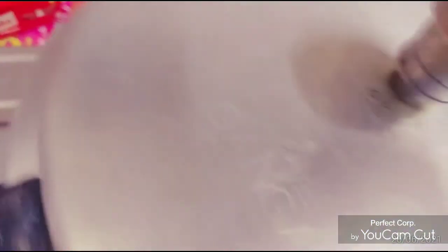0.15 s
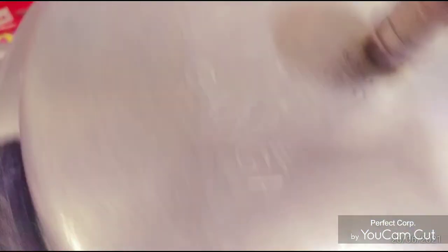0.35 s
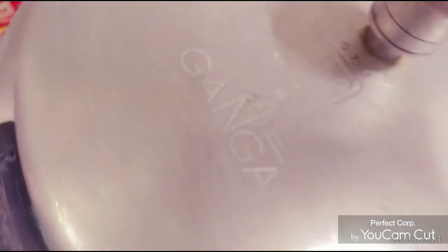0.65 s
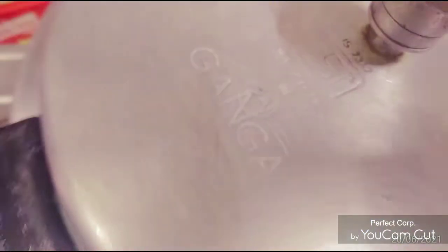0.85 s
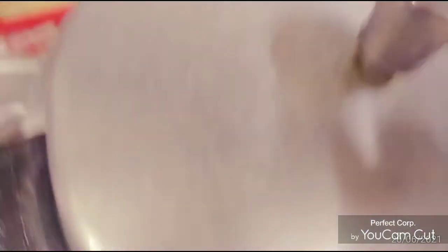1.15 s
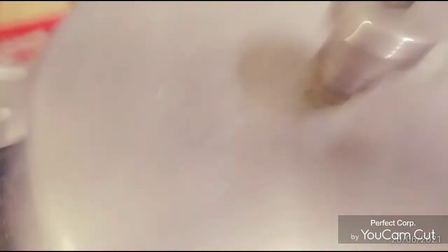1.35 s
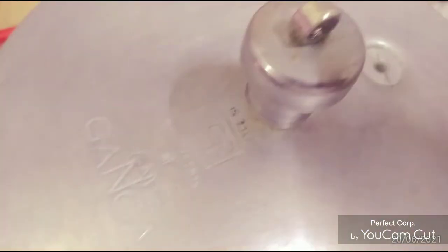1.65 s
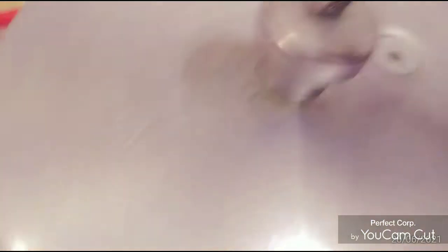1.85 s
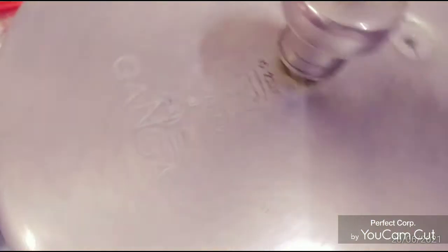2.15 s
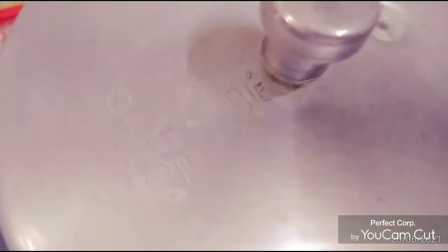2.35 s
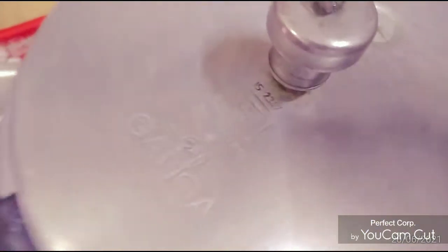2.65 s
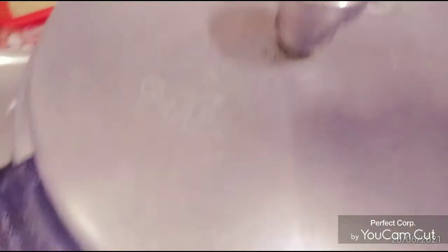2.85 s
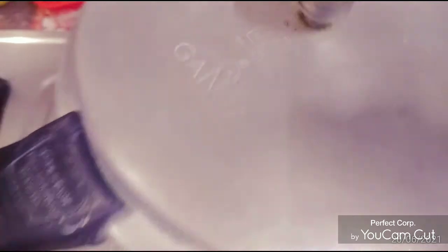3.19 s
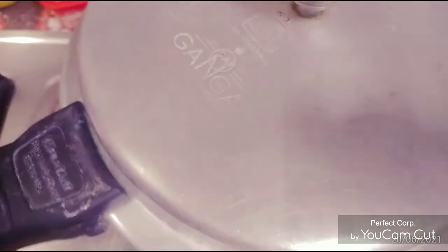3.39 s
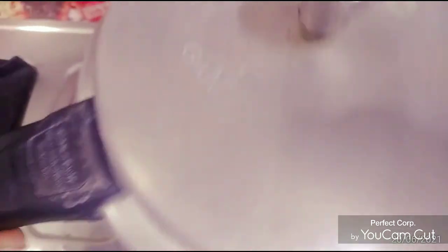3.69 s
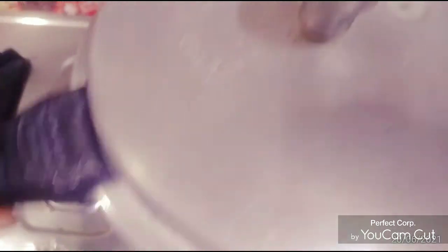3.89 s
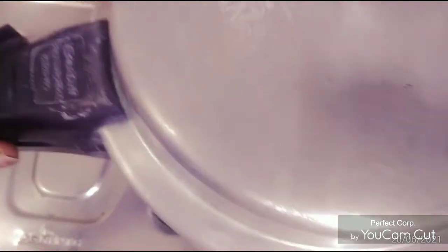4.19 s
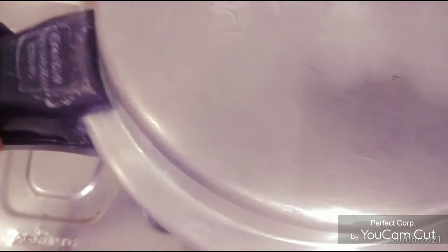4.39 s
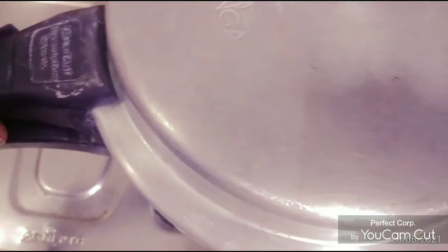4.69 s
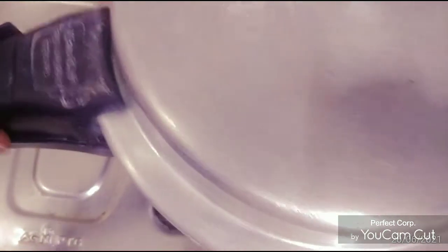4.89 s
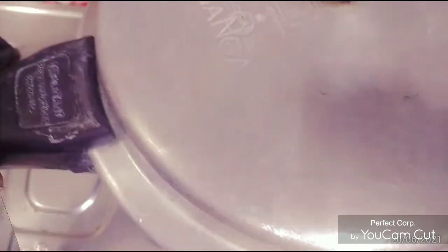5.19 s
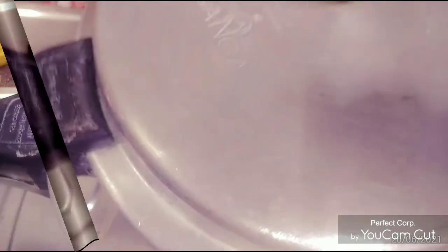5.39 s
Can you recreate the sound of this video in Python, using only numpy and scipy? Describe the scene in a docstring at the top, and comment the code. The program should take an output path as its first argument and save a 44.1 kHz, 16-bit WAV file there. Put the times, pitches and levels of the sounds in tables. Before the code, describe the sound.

A close phone recording in a small, quiet kitchen with faint low rumble and hiss. From 0 to 0.4 s a metal pressure cooker lid is shoved on its pot: bright, sharp clinks at about 0.15 and 0.33 s, with hollow low booms and short gritty scrapes. Then near silence, with tiny finger brushes at 0.7 and 1.1 s and a crisp tick at 1.33 s. From 1.8 to 2.7 s come duller, spaced bumps with juddering slides, and a clearer ringing clank at 2.78 s. Soft taps and scrapes run from 3.0 to 3.3 s. Between 3.54 and 4.07 s the loudest passage arrives: a fast, uneven rattle of hard clanks, ringing rim and scraping as the lid is twisted shut. Afterwards only a light scrape near 4.4 s and a weak pair of knocks with rubbing around 4.9 s, then quiet background. Decays are short, with a slight room tail.

```python
"""Metallic clinks, hollow booms and scrapes sound as a pressure cooker lid is shuffled over its pot's rim,
rattles into its lugs and is twisted shut. Each impact is chattering noise and decaying modes: lid boom,
wall knock, rim ring and treble clink. Around and between impacts, noise driven by random slips makes the
rim scrape, and a wavering tone makes the lid judder. Shaped noise gives the fingers brushing the phone
held close, the short tail of the small kitchen and its quiet rumble and hiss."""
import sys
import numpy as np
from scipy import signal
from scipy.fft import rfft, irfft, next_fast_len
from scipy.io import wavfile

SR = 44100
rng = np.random.default_rng(int(sys.argv[2]) if len(sys.argv) > 2 else 0)


def to_wav(s):
    """Save 16-bit WAV."""
    ch = np.atleast_2d(s).T  # columns
    pcm = np.round(np.clip(ch, -1, 1) * 32767)  # PCM
    wavfile.write(sys.argv[1], SR, pcm.astype(np.int16))


N = 244198  # samples

# registers of the metal: (low_hz, high_hz)
KNOCK_HZ, RING_HZ, CLINK_HZ = (450, 1550), (1550, 2700), (2700, 14500)
BLOW_S = 0.012  # opening of an impact over which its level is set

# Rim strikes: (start_s, strength_db, edge_db, sharpness_db)
# a flat landing (edge below 0) booms the lid, an edge-on one rings the rim; sharpness adds treble
RIM_STRIKES = [(.059, -48.5, -6.5, 9), (0.106, -41, -7.5, 13), (.145, -28, 0.5, 0.5),
               (0.1511, -30, -1.5, 8.5), (.326, -34, -6.5, 8), (.339, -38.5, -3, 10.5), (.357, -38.5, 6, 6),
               (.364, -41, -3, 9.5), (1.777, -45.5, -7, 0), (1.823, -44, -1, 0), (1.843, -43.5, -7, -5),
               (1.875, -36, -4.5, -6), (2.158, -40.5, -12.5, -9), (2.192, -34.5, -3.5, -3.5),
               (2.361, -40.5, -6, -4.5), (2.436, -35.5, 0.5, -6.5), (2.613, -35.5, -2, -8),
               (2.782, -28, 1.5, -2.5), (3.029, -44.5, -5.5, -3), (3.117, -42, -1.5, -5),
               (3.178, -45.5, -2, 0.5), (3.234, -44.5, -0.5, -3.5), (3.309, -43.5, -2, 0),
               (3.5354, -37.5, 3.5, -14), (3.54, -26, 1.5, -1.5), (3.6027, -31.5, 3.5, -2),
               (3.645, -24, 0.5, 0), (3.663, -38.5, 8, -5.5), (3.731, -35, -2, 2), (3.787, -39, 12.5, -2),
               (3.8347, -23.5, -1.5, -2), (3.93, -25.5, -2, 3), (3.9935, -35, 0.5, -4),
               (4.004, -27, -1, -3.5), (4.01, -34.5, 10, -3.5), (4.066, -39, 1.5, -6), (4.459, -49, -8, -1),
               (4.818, -50.5, -2, -6), (4.899, -39.5, -5.5, 2), (4.969, -39, -6.5, -7)]


def clinks():
    """Impact excitation: every strike booms the lid and sounds three registers of the metal."""
    out = np.zeros(N)
    t = np.arange(int(0.3 * SR)) / SR
    for start_s, strength_db, edge_db, sharpness_db in RIM_STRIKES:
        boom_db, knock_db, ring_db, clink_db = contact_levels(start_s, strength_db, edge_db, sharpness_db)
        low_boom = boom(t, lid_pitch(start_s), t60=0.064, thud_db=-10.0)
        # only hard knocks set the wall's low modes ringing clearly
        clear_db = 0.76 * (knock_db + 24.5)
        knock = strike(t, KNOCK_HZ, onset_s=0.000072, chatter_s=0.0038,
                       tail_db=1.5, tail_t60=0.07, modes_db=clear_db)
        ring = strike(t, RING_HZ, onset_s=0.00064, chatter_s=0.0076,
                      tail_db=-6.5, tail_t60=0.095, modes_db=seating(start_s)[0])
        clink = strike(t, CLINK_HZ, onset_s=0.0035, chatter_s=0.0056,
                       tail_db=-10, tail_t60=0.055, modes_db=-9)
        # a lighter touch has less of the highest treble
        top_db = clink_db + 26.5
        clink = unit(tint(clink, [(8500, 0), (13000, top_db)]), int(BLOW_S * SR))
        hit = undb(boom_db) * low_boom + undb(knock_db) * knock
        hit += undb(ring_db) * ring + undb(clink_db) * clink
        add(out, start_s, hit)
    return out


def strike(t, band, onset_s, chatter_s, tail_db, tail_t60, modes_db):
    """Contact chatter and modal decay: brief noisy contact, a dense dying tail and clear ringing modes."""
    blow = int(BLOW_S * SR)
    # uneven bounces: the contact level fluctuates mostly on a scale of a millisecond or so
    bounce_db = 4 * tint(noise(len(t)), [(300, 0), (700, 0), (2000, -30)], (200, 2000))
    chatter = unit(undb(bounce_db)) * np.exp(-(t / chatter_s) ** 4)
    contact = chatter + undb(tail_db) * fade(t, tail_t60)
    crack = unit(wall(len(t), band) * contact * (1 - np.exp(-t / onset_s)), blow)
    ring = unit(rim_modes(t, band) * (1 - np.exp(-t / 0.00096)), blow)
    return unit(crack + undb(modes_db) * ring, blow)


# Clear modes of the rim and pot wall: (pitch_hz, level_db, t60_s)
RIM_MODES = [(1100, -8.5, 0.097), (1336, -3.5, 0.016), (1683, -6, 0.09), (1764.4, 2.5, 0.058),
             (2142, -15.5, 0.15), (3876, 1.5, 0.056), (4060, -13.5, 0.1), (4630, -16, 0.12),
             (6480, -5, 0.1), (7100, -12, 0.086), (8280, 0, 0.12), (8500, -13, .055), (7930, 1, 0.061),
             (10020, -2, 0.1), (13120, -22, 0.025)]


def rim_modes(t, band):
    """Modal superposition: damped sines, whose shares shift a few dB with the point of contact."""
    out = 0
    for pitch_hz, level_db, t60 in RIM_MODES:
        if band[0] < pitch_hz < band[1]:
            cycles = pitch_hz * (1 + 0.003 * rng.normal()) * t + rng.random()
            gain = undb(level_db + 2 * rng.normal())
            out = out + gain * fade(t, t60) * np.sin(2 * np.pi * cycles)
    return out


# Spectrum of the dense, quickly damped modes of the metal: (pitch_hz, level_db)
METAL_SPECTRUM = [(480, 4.5), (850, -0.5), (1300, -0.5), (2000, 3.5), (2500, -8), (3400, -9), (3900, -2.5),
                  (4700, -12), (5400, -23.5), (6100, -11), (8400, 1), (10300, -12.5), (11800, -24),
                  (14000, -25)]


def wall(size, band):
    """High modal density: shaped noise, whose spectrum varies by contact, most of all in the treble."""
    hz = np.linspace(400, 14500, 100)
    ripple_db = np.interp(hz, [2500, 6000], [1.5, 4])
    metal_hz, metal_db = np.transpose(METAL_SPECTRUM)
    db = np.interp(np.log(hz), np.log(metal_hz), metal_db) + ripple_db * noise(len(hz))
    return tint(noise(size), np.column_stack([hz, db]), band)


# Spectrum of the dull thud of the pot on its stand: (pitch_hz, level_db)
POT_THUD = [(45, -16), (105, 2), (210, -1.5), (330, 3.5), (470, -0.5), (850, -27)]


def boom(t, hz, t60, thud_db):
    """Flexural resonance: the lid flexes like a drum head over a dull thud of the pot."""
    blow = int(BLOW_S * SR)
    flex = 0
    # a weaker mode on each side beats with the main one
    for ratio, level_db in ((0.91, -36), (1, 11), (1.08, -3.5)):
        mode_hz = hz * ratio * (1 + 0.013 * rng.normal())
        flex = flex + undb(level_db) * np.sin(2 * np.pi * mode_hz * t)
    flex = unit(flex * fade(t, t60) * (1 - np.exp(-t / 0.0037)), blow)
    thud = tint(noise(len(t)), POT_THUD) * fade(t, 0.13)
    return unit(flex + undb(thud_db) * thud * (1 - np.exp(-t / 0.0012)), blow)


# The lid's lowest mode sags in the early shoves, then wanders between about 300 and 345 Hz:
# (time_s, pitch_hz)
LID_MODE = [(.07, 402.3), (.16, 355), (.37, 300.8), (1.78, 345), (1.9, 306.4), (2.16, 341.3), (2.2, 304),
            (2.44, 312), (2.62, 345), (3.93, 338.8), (4.05, 315.5), (4.95, 342)]


def lid_pitch(s):
    """Boundary conditions: the way the lid is seated sets its lowest mode in Hz at time s."""
    return np.interp(s, *np.transpose(LID_MODE))


# The loose lid knocks on the pot wall; the rim rings clearest against the lugs:
# (time_s, clear_modes_db, knock_db)
LID_SEATING = [(.15, -16, 1), (.33, -13, -3), (2.5, -4.5, -4), (2.78, 9, -7), (4.05, 4, -3.5),
               (4.5, 0.5, -1)]


def seating(s):
    """Contact coupling: levels of the clear modes and of the knock at time s, in dB."""
    times, *columns = np.transpose(LID_SEATING)
    return [np.interp(s, times, column) for column in columns]


def contact_levels(s, strength_db, edge_db, sharpness_db):
    """Modal excitation: a contact's angle and sharpness share it among boom, knock, ring and clink."""
    boom_db = strength_db - edge_db
    knock_db = strength_db + seating(s)[1]
    ring_db = strength_db + edge_db
    return boom_db, knock_db, ring_db, ring_db + sharpness_db


# Slides of the lid along the rim: (start_s, end_s, strength_db, edge_db, sharpness_db)
RIM_SLIDES = [(0.031, .1, -47.5, -5, 0), (0.094, 0.149, -37, -5.5, 1), (.16, 0.254, -41.5, -4.5, 2.5),
              (.27, 0.388, -43.5, -6.5, 2.5), (0.476, 0.506, -64, -10.5, -6), (1.809, 1.924, -49, 3, -3.5),
              (2.125, 2.195, -41, -2, -3), (2.201, 2.284, -50.5, 2.5, -2), (2.33, 2.434, -50.5, -1, -1.5),
              (2.643, 2.755, -47.5, -0.5, -3), (3.047, 3.08, -46, 1.5, -17), (3.127, 3.152, -45, -1.5, -10),
              (3.2, 3.317, -43, 1, -6.5), (3.553, 3.594, -36, -0.5, -3), (3.621, 3.673, -39, 2.5, 1),
              (3.669, 3.797, -42.5, 5, -8), (3.871, 3.986, -47, -1.5, -3.5), (4.029, 4.129, -42, -2.5, -11),
              (4.383, 4.491, -46, -2.5, -3), (4.714, 4.722, -55.5, -2, -14), (4.843, 4.87, -47.5, -1, -2),
              (4.914, 4.969, -49, -1.5, -6)]
PUSH_DB = 2  # growth over a slide as the hand pushes on


def scrapes(judder_gain_db, rasp_gain_db, grit_gain_db, overhang_s):
    """Frictional excitation: low judder, a ringing rasp in the wall and fine grit on top."""
    out = np.zeros(N)
    for start_s, end_s, strength_db, edge_db, sharpness_db in RIM_SLIDES:
        s = start_s - overhang_s
        size = int(max(end_s - start_s + 2 * overhang_s, BLOW_S) * SR)
        judder_db, _, rasp_db, grit_db = contact_levels(start_s, strength_db, edge_db, sharpness_db)
        rasp = friction(size, (KNOCK_HZ[0], RING_HZ[1]), slips_per_s=110, slip_db=7.5, modes_db=-2.5)
        grit = friction(size, CLINK_HZ, slips_per_s=260, slip_db=-2, modes_db=-14.5)
        low = judder(size, lid_pitch(s + np.arange(size) / SR), waver=0.06, rumble_db=-8.0)
        layers = ((judder_db + judder_gain_db, low),
                  (rasp_db + rasp_gain_db, rasp),
                  (grit_db + grit_gain_db, grit))
        for level_db, sound in layers:
            push_db = PUSH_DB * (np.minimum(np.arange(len(sound)) / size, 1) - 0.5)
            add(out, s, undb(level_db + push_db) * sound)
    return out


def friction(size, band, slips_per_s, slip_db, modes_db):
    """Random slip excitation: uneven ticks over a smooth rub drive the resonant metal."""
    t = np.arange(int(0.15 * SR)) / SR
    slips = (rng.random(size) < slips_per_s / SR) * rng.exponential(size=size)
    # each slip dies away with a time constant of 1.6 ms
    ticks = signal.lfilter([1], [1, -np.exp(-1 / (0.0016 * SR))], slips)
    force = (1 + undb(slip_db) * ticks) * np.sin(np.pi * np.arange(size) / size)
    ring = signal.fftconvolve(force * noise(size), rim_modes(t, band))
    rub = np.pad(force * wall(size, band), (0, len(t) - 1))
    scrape = unit(rub, size) + undb(modes_db) * unit(ring, size)
    # a slide is a softer contact than a blow, so it is duller at the top
    return unit(tint(scrape, [(9000, 1), (13000, -1)]), size)


def judder(size, hz, waver, rumble_db):
    """Stick-slip oscillation: the lid's lowest mode sounds in lumps, unsteady in pitch and strength."""
    wander = [(30, 1.5), (60, -3.0), (150, -63)]  # (Hz, dB)
    pace, grip = (tint(noise(size + SR // 4), wander)[:size] for _ in range(2))
    # the pitch wanders about that of the lid's lowest mode
    wandering_hz = hz * (1 + waver * (pace - pace.mean()))
    tone = np.sin(2 * np.pi * np.cumsum(wandering_hz) / SR) * undb(4.1 * grip)
    rumble = undb(rumble_db) * tint(noise(size), POT_THUD)
    return unit((unit(tone) + rumble) * swell(size, edge=0.39))


# Spectrum of the fingers' touch: (pitch_hz, level_db)
FINGER_SPECTRUM = [(500, 5.5), (2000, -1), (5000, -5.5), (9000, 3.5), (12500, 1), (14000, -5)]
# Fingers on the phone; a touch fades out by twice its length: (start_s, length_s, level_db)
FINGER_BRUSHES = [(0.688, 0.0068, -53), (0.689, 0.019, -63), (1.068, 0.066, -60), (1.156, 0.045, -56.5),
                  (1.3266, 0.0032, -38), (1.339, 0.043, -51.5)]


def fingers():
    """Broadband friction noise: ticks and short hissy brushes of skin on the phone's case."""
    out = np.zeros(N)
    for start_s, length_s, level_db in FINGER_BRUSHES:
        t = np.arange(int(2 * length_s * SR) + 2) / SR
        # the touch builds quickly and trails off
        touch = t / length_s * np.exp(-(2 * t / length_s) ** 2)
        skin = tint(noise(len(t)), FINGER_SPECTRUM)
        add(out, start_s, undb(level_db) * skin * unit(touch, len(t) // 2))
    return out


def kitchen(x, wet_db, t60, delay_s):
    """Reverberation: close walls return a short, dense tail, modelled as decaying shaped noise."""
    t = np.arange(SR // 2) / SR
    tail = tint(noise(len(t)), [(100, 1.5), (400, 4.5), (2000, -2.5), (8000, -3.0), (14000, -12.0)])
    tail *= fade(t, t60) * (1 - np.exp(-(t / delay_s) ** 2))
    return undb(wet_db) * signal.fftconvolve(x, tail / np.linalg.norm(tail))[:N]


# Spectrum of the kitchen background and microphone hiss: (pitch_hz, level_db)
QUIET_SPECTRUM = [(20, 3.5), (30, -9.5), (55, -14.5), (160, -9), (260, -20), (500, -19), (1000, -22.5),
                  (2200, -24.5), (3600, -35), (5400, -40.5), (6800, -34), (8400, -27.5), (11000, -41),
                  (14000, -46)]


def background():
    """Stationary noise: steady low rumble and soft hiss."""
    return tint(noise(N), QUIET_SPECTRUM) * undb(-54)


def undb(db):
    """Logarithmic level: decibels to amplitude gain."""
    return 10 ** (np.asarray(db) / 20)


def unit(x, size=None):
    """Root-mean-square level: scale x to rms 1, judged on the first size samples."""
    return x / np.sqrt(np.mean(x[:size] ** 2) + 1e-18)


def tint(x, colour, band=(15, 20000)):
    """Spectral filtering: weight x by (Hz, dB) points within a band, then scale to rms 1."""
    size = next_fast_len(len(x))
    f = np.maximum(np.arange(size // 2 + 1) * SR / size, 1)
    hz, db = np.transpose(colour)
    gain = undb(np.interp(np.log(f), np.log(hz), db))
    gain = gain * (f > band[0]) * (f < band[1])
    return unit(irfft(rfft(x, size) * gain, size)[:len(x)])


def noise(size):
    """White noise: equal mean power at all frequencies."""
    return rng.standard_normal(size)


def fade(t, t60):
    """Exponential damping: a fall of 60 dB in t60 seconds."""
    return np.exp(-np.log(1000) * t / t60)


def swell(size, edge):
    """Amplitude envelope: tapers at both ends take up the share edge of the length."""
    return unit(signal.windows.tukey(size, np.clip(edge, 0, 1)))


def add(out, s, x):
    """Linear superposition: mix x into out at time s."""
    i = max(int(s * SR), 0)
    out[i:i + len(x)] += x[:max(len(out) - i, 0)]


def scene():
    """Superposition of lid and pot, their reverberation, the fingers and the background."""
    cooker = clinks()
    cooker = cooker + scrapes(judder_gain_db=0, rasp_gain_db=-5.5, grit_gain_db=-4.5, overhang_s=0.009)
    room = kitchen(cooker, wet_db=-17.5, t60=0.29, delay_s=0.0089)
    return (cooker + room + fingers() + background())[None]


def record(dry):
    """Band limitation: the phone cuts the top above 13.9 kHz with a steep low-pass filter."""
    return signal.sosfilt(signal.ellip(8, 0.2, 70, 13900, fs=SR, output="sos"), dry)


dry = scene()
out = record(dry)
to_wav(out)
```